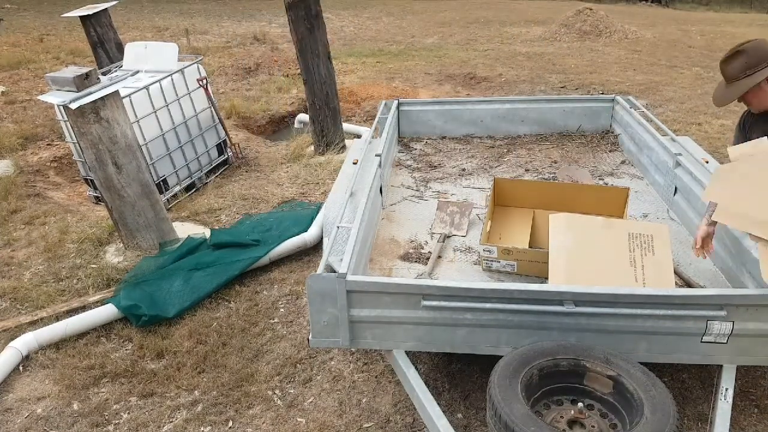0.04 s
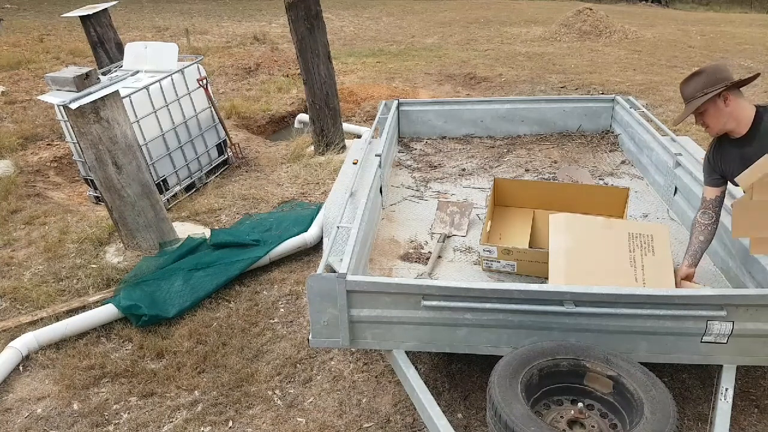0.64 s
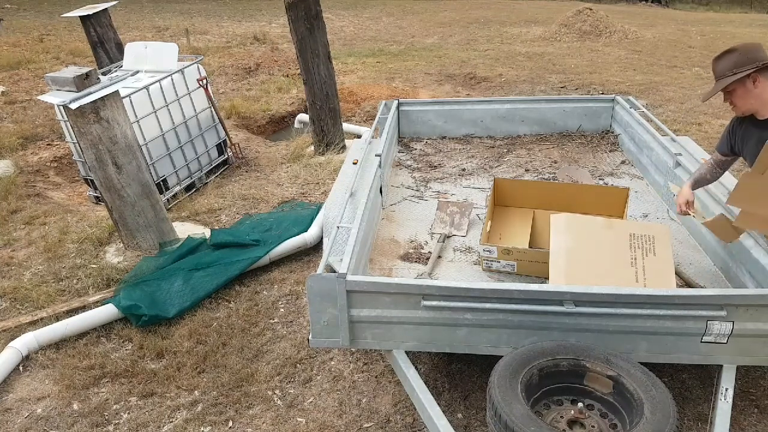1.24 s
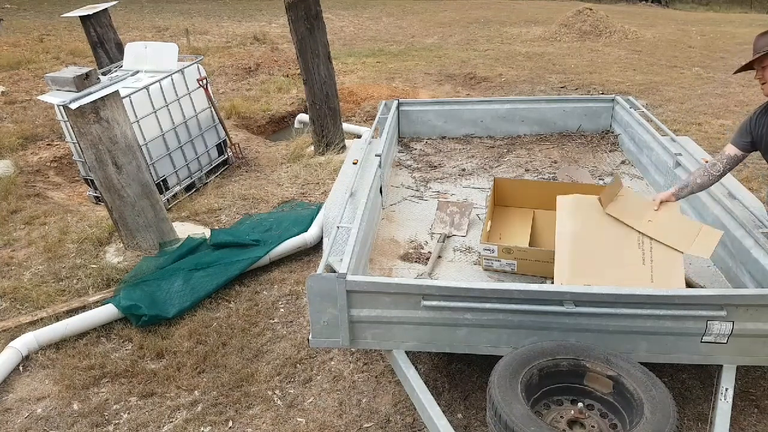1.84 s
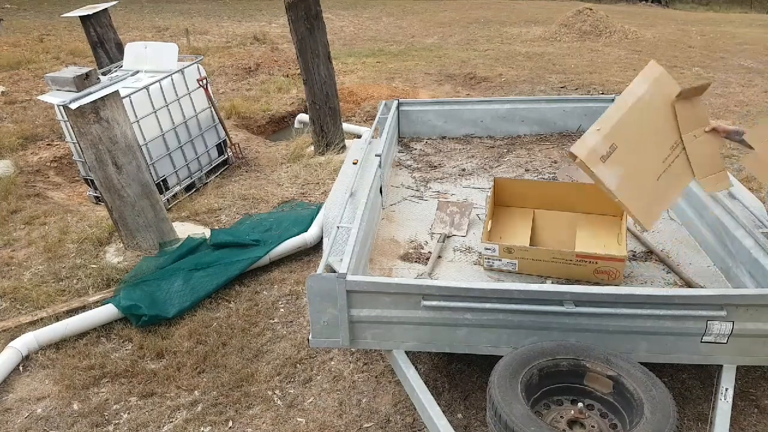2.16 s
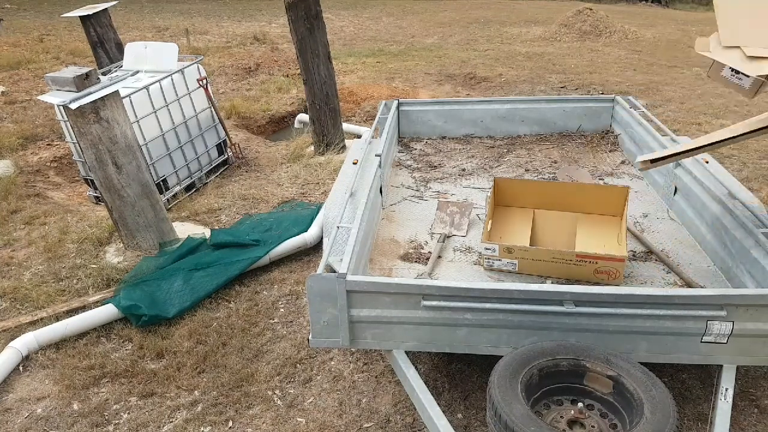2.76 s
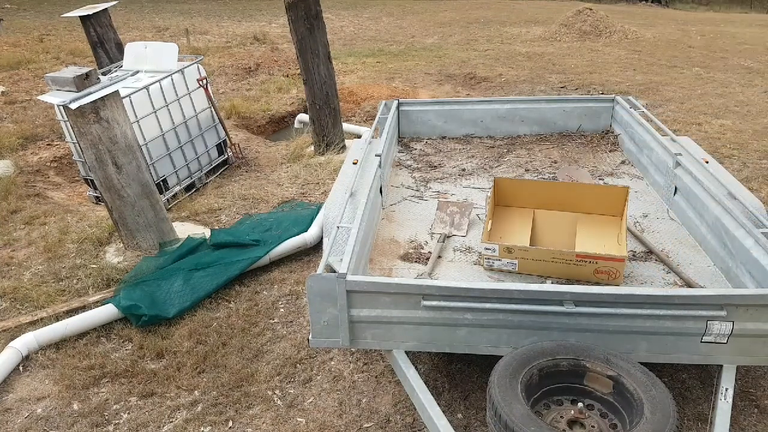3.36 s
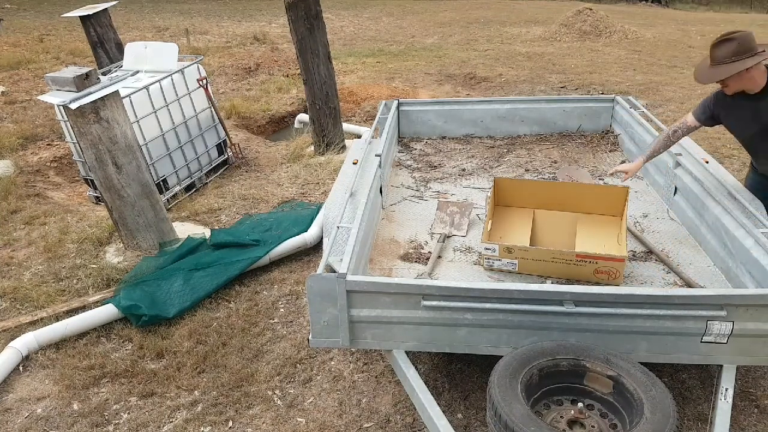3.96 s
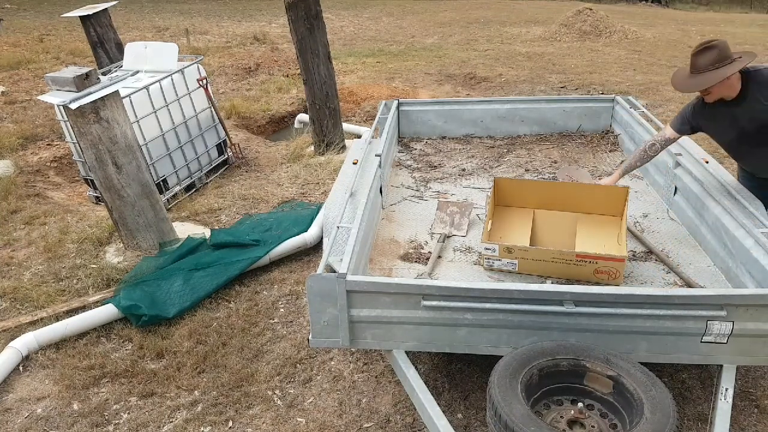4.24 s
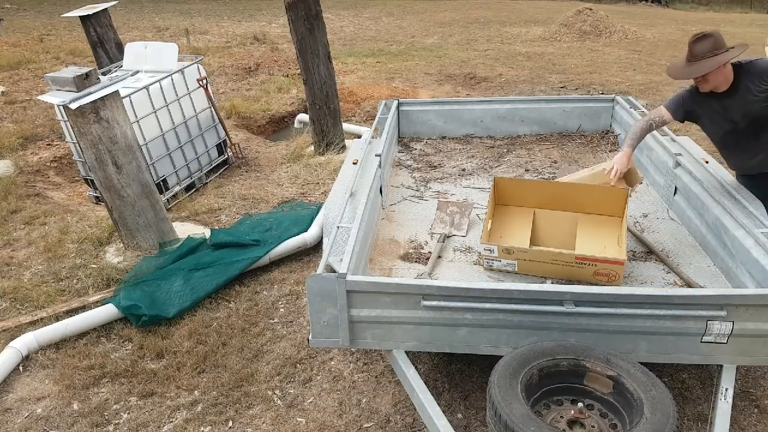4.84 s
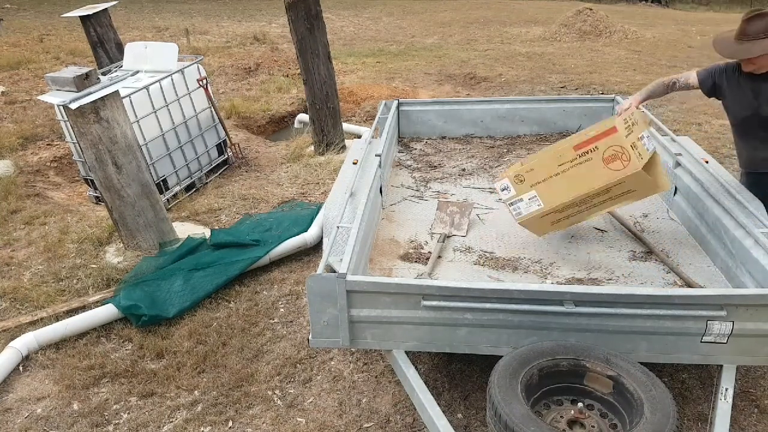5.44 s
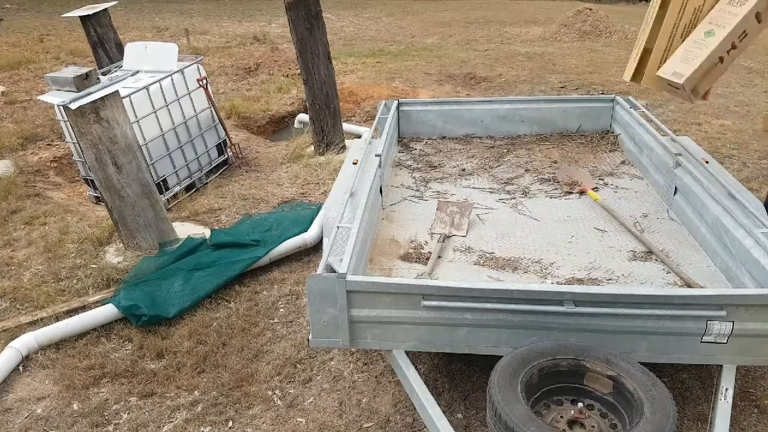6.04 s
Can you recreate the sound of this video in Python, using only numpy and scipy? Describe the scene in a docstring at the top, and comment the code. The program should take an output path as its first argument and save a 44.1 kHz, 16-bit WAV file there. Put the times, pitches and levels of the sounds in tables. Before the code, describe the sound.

Soft outdoor air lies behind everything, cutting out for an instant at about 0.3 seconds. From 0.5 to 2 seconds, a few metres away, cardboard is dragged over the gritty bed of a steel trailer in short, uneven scrapes and rustles, with a cluster of hollow knocks around 0.9 seconds and more near 1.6 and 1.8. A few faint ticks lead into a lull. From 3 to 3.5 seconds cardboard slides lightly with a papery hiss, then lands with a hollow knock at 3.6. Another box starts moving at about 3.9 seconds and builds to the loudest stretch, from 4.8 to 5.5, with rumbling panels, rasping edges, knocks, ticks and tiny squeaks. The trailer walls add a very short, close reflection. A last faint rustle fades at around 6 seconds.

```python
"""A steel trailer in quiet open country: a few metres away, someone pulls cardboard boxes out of it.
The boards stick and slip over the gritty bed, so panels rumble, edges rasp and paper faces hiss.
Hollow panels knock, edges tick and squeak, and the steel walls throw the body of the sound back
within milliseconds. Soft outdoor air lies behind; near the start everything drops out briefly."""
import sys
import numpy as np
from scipy import signal
from scipy.fft import rfft, irfft, next_fast_len
from scipy.io import wavfile
from scipy.ndimage import uniform_filter1d

SR = 44100
rng = np.random.default_rng(int(sys.argv[2]) if len(sys.argv) > 2 else 0)


def transcribe(signal):
    """Save signal, clipped to [-1, 1], as a 16-bit WAV file at the path in sys.argv[1]."""
    frames = np.atleast_2d(signal).T
    limited = np.clip(frames, -1, 1)
    pcm = np.round(limited * 32767).astype(np.int16)
    wavfile.write(sys.argv[1], SR, pcm)


N = 268701
TIME = np.arange(N) / SR

# Cardboard slides: a sheet is gathered, a flat box dragged out, both put down, an open box pulled.
# Each row: start in seconds, length in seconds, rumble, rasp and hiss in dB, panel pitch in Hz.
STROKES = [ (0.455, 0.073, -61, -59.5, -65, 451.6), (0.509, 0.02, -45, -47, -54.5, 453.6),
           (0.589, 0.1031, -49, -59, -67, 400.3), (0.703, 0.061, -45, -52.5, -61.5, 329.5),
           (0.806, 0.1238, -44.5, -45.5, -54, 452.1), (.91, 0.077, -42.5, -56, -54.5, 498),
           (1.0, 0.1302, -48, -51.5, -51.5, 500), (1.136, 0.0399, -45.5, -57, -79, 451.1),
           (1.268, 0.0502, -47, -53.5, -63, 298.9), (1.327, 0.1183, -55, -71, -89, 269.2),
           (1.547, 0.0417, -40, -53, -63, 450.4), (1.619, 0.1, -42, -46.5, -58.5, 470.2),
           (1.748, 0.1357, -44.5, -52, -71, 419), (1.872, 0.059, -42, -47.5, -71, 525.2),
           (2.06, 0.076, -57.5, -54.5, -70, 551.9), (2.749, 0.214, -72, -67, -69.5, 701.4),
           (3.022, 0.13, -51.5, -53.5, -57, 722.5), (3.195, 0.11, -60.5, -62, -61.5, 702.9),
           (3.301, 0.068, -50.5, -57.5, -61, 695.5), (3.38, 0.1413, -56, -61, -64, 719.2),
           (3.866, .31, -60.5, -68, -69.5, 499.9), (4.28, 0.1864, -46.5, -57, -65, 330),
           (4.402, 0.077, -43.5, -48, -57, 344.2), (4.495, .14, -49.5, -52, -53.5, 381.9),
           (4.664, 0.13, -49.5, -70, -64, 387.7), (4.823, 0.0571, -38, -43, -49.5, 372.8),
           (4.897, 0.1226, -40.5, -44, -54.5, 299.7), (5.039, 0.0413, -37, -46, -52.5, 431.3),
           (5.096, 0.076, -45, -54.5, -58.5, 219.2), (5.194, .14, -37.5, -43, -48.5, 249.7),
           (5.358, 0.0426, -36, -41, -46.5, 396.9), (5.432, 0.14, -47.5, -53, -65.5, 444.6),
           (5.692, 0.068, -59, -62, -62, 438.4), (5.748, 0.45, -62.5, -70, -81, 439.7)]
# Bending modes of the boxes. Each row: pitch in Hz, width in Hz, gain in dB.
PANEL_MODES = [(154, 38, 3), (268, 20, -5.5), (343, 86, -6.5), (469, 20, 3), (605.7, 16, 5),
               (787, 55, -4.5), (1021, 58, 2), (1327, 80, -3), (1750, 140, -5.5), (2350, 260, -9.5)]
# Tone curves of the sliding board. Each row: frequency in Hz, gain in dB.
RUMBLE_EQ = [(40, -12.5), (100, -3.5), (180, -2.5), (330, 4), (560, 1.5), (900, -3), (1400, -34.5),
             (3000, -43.5)]  # shaking panels
RASP_EQ = [(300, -21.5), (650, -14.5), (1000, -4.5), (1500, -0.5), (2100, -2.5), (3000, -5), (4500, -11),
           (8000, -18)]  # scraping edges
HISS_EQ = [(1200, -18.5), (3000, -0.5), (5000, -1), (7000, -1.5), (9200, -6.5), (12000, -5.5), (15500, -15)]  # paper fibres
SHEEN_EQ = [(3000, -16.5), (8000, -6.5), (13500, -3), (16000, -6)]  # paper that glides lightly
# Hollow knocks. Each row: start in seconds, level in dB, pitch in Hz, crack in dB against the thump.
KNOCKS = [(0.6231, -48, 830, -20), (0.8584, -28, 557, -33), (0.8678, -31.5, 566, -23),
          (.888, -37, 500, -10), (.956, -30, 802, -12), (.968, -34, 515, -7.5), (1.143, -45, 560, -13),
          (1.273, -47, 700, -9), (1.549, -46, 594, 0), (1.625, -35, 602, -6), (1.808, -36.5, 371, -25),
          (2.256, -57, 710, -5), (2.631, -58.5, 620, -5), (3.283, -43, 648, -17), (3.447, -49, 620, -24),
          (3.483, -50.5, 570, -22), (3.6034, -30.5, 668, -20.5), (3.624, -46, 850, -6.5),
          (4.18, -57, 570, -22), (4.638, -44, 443, -8), (4.737, -45, 272, -15.5), (4.781, -55, 507, 0),
          (4.829, -52, 470, -16), (5.06, -37, 235, -11), (5.181, -43.5, 423, -5), (5.2146, -30, 286, -15),
          (5.232, -29.5, 577, -16), (5.283, -43, 229, -12), (5.383, -37, 880, -23)]
# Edges juddering on board or steel. Each row: start in seconds, level in dB, pitch in Hz.
SQUEAKS = [(3.2134, -49, 3050), (4.457, -59, 2580), (4.854, -45, 2086), (4.925, -53, 1630),
           (4.957, -41, 1760), (5.049, -46, 1550), (5.231, -44, 1234), (5.288, -44.5, 1508),
           (5.309, -48, 1460), (5.365, -42, 1383), (5.38, -43.5, 1185)]
# Edges and grit that catch and snap. Each row: start in seconds, level in dB, ring in Hz.
TICKS = [(0.515, -57, 1894), (1.273, -53, 2480), (1.288, -54, 2680), (1.6249, -66, 1870),
         (2.0644, -55, 2230), (2.0822, -54, 2220), (2.1076, -53.5, 2102), (3.2411, -52.5, 3440),
         (3.2842, -55.5, 3560), (3.3872, -58.5, 3200), (3.609, -55, 2950), (3.679, -62, 6000),
         (4.354, -56.5, 1900), (4.5173, -51.5, 5440), (4.8289, -53, 2100), (4.9292, -48.5, 1810),
         (4.9867, -50.5, 1800), (5.2344, -46.5, 4900)]
# Early reflections off the bed and walls. Each row: delay in seconds, linear gain.
REFLECTIONS = [(.0041, 0.076), (.0125, 0.11), (0.0213, .2)]
# Tone curve of the open air. Each row: frequency in Hz, gain in dB.
COUNTRY_EQ = [(25, -6.5), (60, -4.5), (140, -2.5), (250, -0.5), (470, 3), (800, -3.5), (1300, -10.5),
              (2100, -15), (3400, -7.5), (4500, -15.5), (6500, -20.5), (9000, -25), (12000, -27.5),
              (15500, -37)]
# The two microphone ports. Each row: frequency in Hz, left and right gain in dB, likeness from 0 to 1.
MIC_PORTS = [(105, 1.5, 3, .998), (505, -1, -1, 0.95), (1010, 1, 0.5, 0.99), (1840, 3, -2, 0.83),
             (3120, -4, -1.5, 0.02), (4430, -1.5, -2, 0.08), (4940, -0.5, -0.5, 0.03),
             (5880, 1, -6.5, 0.03), (7480, 5.5, -15.5, 0.85), (8860, -3, -12.5, 0.53), (11340, 9, -14, 0.1),
             (16200, -5, -10, 1)]

GRIP_SHARE, SAG_DB, RELEASE_T60_S = 0.16, -2.5, 0.21  # a stroke's build-up, easing and tail
STIFF_HZ = (450, 696)  # panels lose their bass as their pitch climbs through this range
FLAP_T60_S = 0.13  # chatter of loose flaps after a knock
RING_DB, RING_WIDTH_SHARE = -4, 0.071  # a struck panel sings briefly at its own pitch
COUNTRY_DB, MIC_HISS_DB = -60.5, -74.5
RIGHT_LEAD_S, TOP_HZ = 0.00019, 15850
DROPOUT_START_S, DROPOUT_END_S = .312, .448


def sliding():
    """Stick and slip shakes panels, rasps edges and crackles fibres: a mono body and a stereo hiss."""
    rumble_gain, rasp_gain, hiss_gain, pitch_hz = stroke_envelopes()
    catches = slips(per_s=750, spread_db=4)
    grit = slips(per_s=2500, spread_db=11)
    board = panel(catches + .5 * grit, direct=0.98)
    board = varispeed(board, 1 + .07 * drift(7))  # bending and a shifting grip let the modes wander
    rumble = panel_rumble(board, catches, pitch_hz)
    judder = unit(undb(2.24 * drift(130)))
    rasp = even_out(colour(board, RASP_EQ), window_s=0.025) * judder
    lightness = hiss_gain / (hiss_gain + rumble_gain + 1e-9)
    hiss = paper_hiss(catches, lightness) * judder
    return rumble * rumble_gain + rasp * rasp_gain, hiss * hiss_gain


def stroke_envelopes():
    """Gains of rumble, rasp and hiss over all strokes, and the pitch of the panel that is rubbing."""
    power = np.zeros((3, N))
    for start_s, length_s, *levels_db, _ in STROKES:
        pressure = push(length_s)
        for track, db in zip(power, levels_db):
            add(track, start_s, (undb(db) * pressure) ** 2)
    starts, lengths, *_, pitches = np.transpose(STROKES)
    pitch_hz = np.interp(TIME, starts + lengths / 2, pitches)
    return (*np.sqrt(power), pitch_hz)


def push(length_s):
    """Pressure of one stroke: it grips, eases as the board comes free, and lets go."""
    t = np.arange(int((length_s + RELEASE_T60_S) * SR)) / SR
    grip = np.minimum(t / (GRIP_SHARE * length_s), 1)
    eased_db = SAG_DB * np.minimum(t / length_s, 1)
    released_db = -60 * np.maximum(t - length_s, 0) / RELEASE_T60_S
    return grip * undb(eased_db + released_db)


def panel_rumble(board, catches, pitch_hz):
    """The shaken board booms at its gliding pitch; the stiffer the panel, the thinner its bass."""
    mean_hz = pitch_hz.mean()
    hollow = resonate(resonate(catches, mean_hz, 0.5 * mean_hz), mean_hz, mean_hz)
    hollow = unit(varispeed(hollow, pitch_hz / mean_hz))
    limp = unit(colour(board, RUMBLE_EQ))
    stiff = unit(colour(limp, [(150, -17), (450, -1.5)]))
    stiffness = np.interp(pitch_hz, STIFF_HZ, [0, 1])
    return even_out((1 - stiffness) * limp + stiffness * stiff + 0.86 * hollow, window_s=0.017)


def paper_hiss(catches, lightness):
    """Fibres crackle on their own and at every catch; the lighter the stroke, the brighter they sound."""
    fibres = [slips(per_s=3500, spread_db=5) + .45 * catches for _ in range(2)]
    sheen = 10 * np.minimum(lightness, .46) ** 3
    return np.array([unit(colour(f, HISS_EQ)) + sheen * unit(colour(f, SHEEN_EQ)) for f in fibres])


def slips(per_s, spread_db):
    """Friction lets go at random moments, in clicks of unequal size."""
    happens = rng.random(N) < per_s / SR
    size = undb(spread_db * np.clip(rng.standard_normal(N), -2, 2))
    return unit(happens * size * rng.choice([-1, 1], N))


def panel(force, direct):
    """A force heard directly and through the bending modes of the board."""
    return direct * force + sum(undb(db) * resonate(force, hz, width) for hz, width, db in PANEL_MODES)


def knocks():
    """Each blow thumps a heavily damped panel, wakes the box modes and cracks at the edge."""
    out, t = np.zeros(N), np.arange(SR // 5) / SR
    for start_s, db, hz, crack_db in KNOCKS:
        force = panel(blow(t, FLAP_T60_S, chatter=.05), direct=2.5)
        # the soft contact passes little far above the panel's pitch
        thump = colour(force, [(0.16 * hz, -21), (0.43 * hz, -12), (0.41 * hz, -3), (hz, 0),
                               (1.406 * hz, -4), (1.95 * hz, -25), (5 * hz, -48)])
        thump = thump + undb(RING_DB) * resonate(thump, hz, RING_WIDTH_SHARE * hz)
        edge_force = blow(t, FLAP_T60_S, chatter=0.11)
        crack = colour(edge_force, [(500, -35), (1200, 8), (2900, 1), (5000, -8.5), (15000, -20)])
        add(out, start_s, at_level(thump, db) + at_level(crack, db + crack_db))
    return out


def blow(t, t60_s, chatter):
    """One sharp contact with a tail of dying chatter."""
    force = chatter * rng.standard_normal(len(t)) * undb(-60 * t / t60_s)
    force[0] += 1
    return force


def squeaks():
    """For a few hundredths of a second an edge's slips fall into a rough, nearly regular rhythm."""
    out, t = np.zeros(N), np.arange(SR // 20) / SR
    swell = t * np.exp(-t / 0.0029)
    for start_s, db, hz in SQUEAKS:
        wobble = unit(uniform_filter1d(rng.standard_normal(len(t)), size=24))
        phase = 2 * np.pi * np.cumsum(hz * (1 + 0.17 * wobble)) / SR
        tone = np.sin(phase) + 0.063 * np.sin(2 * phase) + 0.35 * np.sin(3 * phase)
        add(out, start_s, at_level(swell * tone, db))
    return out


def ticks():
    """An edge lets go and rings briefly: a bright snap of breaking fibres, then a thinner rustle."""
    out, t = np.zeros(N), np.arange(SR // 12) / SR
    for start_s, db, hz in TICKS:
        force = blow(t, t60_s=0.013, chatter=0.94) + blow(t, t60_s=0.17, chatter=0.23)
        ring = 3 * resonate(force, hz, 0.095 * hz)
        add(out, start_s, at_level(colour(force, HISS_EQ) + ring, db))
    return out


def trailer(x, scatter_db, t60_s):
    """The steel walls add a few close reflections and a short, darkened tail."""
    t = np.arange(SR // 3) / SR
    response = rng.standard_normal(len(t)) * undb(-60 * t / t60_s) * (t > .006)
    response *= undb(scatter_db) / np.linalg.norm(response)
    for delay_s, gain in REFLECTIONS:
        add(response, delay_s, np.array([gain]))
    echoes = signal.oaconvolve(x, response)[:N]
    return x + colour(echoes, [(1200, -2), (5000, -0.5), (14000, -26)])


def from_the_right(x, taps=256):
    """Sound reaches the right port first; its treble scatters round the case differently to each."""
    length = next_fast_len(N + taps)
    hz = np.arange(length // 2 + 1) * SR / length
    port_hz, _, _, likeness = np.transpose(MIC_PORTS)
    alike = np.clip(on_log_axis(hz, port_hz, likeness), 0, 1)
    channels = []
    for delay_s in (RIGHT_LEAD_S, 0):
        scatter = rfft(rng.standard_normal(taps), length) / np.sqrt(taps)
        path = np.sqrt(alike) + np.sqrt(1 - alike) * scatter
        # scattering turns the phase far more than it changes the level
        path *= np.sqrt(1.1 / (np.abs(path) ** 2 + .1))
        delay = np.exp(-2j * np.pi * hz * delay_s)
        channels.append(irfft(rfft(x, length) * path * delay, length)[:N])
    return np.array(channels)


def country_air():
    """A soft, gently wavering bed of open air, centred in the bass and wide above it."""
    mid, side = [unit(colour(rng.standard_normal(N), COUNTRY_EQ)) for _ in range(2)]
    side = colour(side, [(40, -1), (120, -15), (500, -9.5), (1200, 2), (3000, 0.5)])
    return np.array([mid + side, mid - side]) * undb(COUNTRY_DB + .7 * drift(5))


def undb(db):
    """Decibels to linear gain."""
    return 10 ** (np.asarray(db) / 20)


def unit(x):
    """Scale to rms 1."""
    return x / np.sqrt(np.mean(x ** 2))


def at_level(x, db):
    """Scale a hit so that its energy, spread over 20 ms, has this level."""
    return x * undb(db) * np.sqrt(SR / 50 / np.sum(x ** 2))


def even_out(x, window_s):
    """Ride the short-time level towards 1, leaving the grain."""
    return x / np.sqrt(uniform_filter1d(x ** 2, int(window_s * SR)) + 0.15 * np.mean(x ** 2))


def add(track, at_s, x):
    """Mix x into the track at a time."""
    i = int(at_s * SR)
    track[i:i + len(x)] += x[:len(track) - i]


def on_log_axis(hz, points_hz, values):
    """Join points by straight lines over log frequency."""
    return np.interp(np.log(hz + 1), np.log(points_hz), values)


def colour(x, points, size=2048):
    """Minimum-phase EQ through points of frequency in Hz and gain in dB."""
    hz = np.arange(size // 2 + 1) * SR / size
    log_gain = np.log(undb(on_log_axis(hz, *np.transpose(points))))
    cepstrum = irfft(log_gain)[:size // 2]
    cepstrum[1:] *= 2
    response = irfft(np.exp(rfft(cepstrum, size)))
    return signal.oaconvolve(x, response)[:len(x)]


def resonate(x, hz, width_hz):
    """One resonance, gain 1 at its centre."""
    return signal.lfilter(*signal.iirpeak(hz, hz / width_hz, fs=SR), x)


def drift(per_s):
    """Random wander at rms 1, gliding to a new value this many times a second."""
    step = int(SR / per_s)
    stairs = np.repeat(rng.standard_normal(N // step + 1), step)
    return unit(uniform_filter1d(stairs, step)[:N])


def varispeed(x, speed):
    """Loop a steady texture at a changing speed, so that its resonances move."""
    return np.interp(np.cumsum(speed) % N, np.arange(N), x)


def scene():
    """The boxes sound in the trailer, with dry hiss and ticks on top and open air behind."""
    body, hiss = sliding()
    boxes = trailer(body + knocks() + squeaks(), scatter_db=-14, t60_s=.22)
    # the boxes carry almost no deep bass below about 70 Hz
    boxes = signal.sosfilt(signal.butter(3, 72, "highpass", fs=SR, output="sos"), boxes)
    # the short waves of hiss and ticks differ at the two ports, so each side gets its own
    return from_the_right(boxes) + hiss + np.array([ticks(), ticks()]) + country_air()


def record(dry):
    """Each port adds its colour and a faint hiss; the sound drops out once, briefly; the top is cut."""
    ports = np.array(MIC_PORTS)
    wet = np.array([colour(dry[c], ports[:, [0, c + 1]]) for c in range(2)])
    wet += undb(MIC_HISS_DB) * rng.standard_normal((2, N))
    live = (TIME < DROPOUT_START_S) | (TIME > DROPOUT_END_S)
    gate = np.maximum(uniform_filter1d(live.astype(float), size=64), undb(-101.5))
    high_cut = signal.ellip(10, .2, 70, TOP_HZ, fs=SR, output="sos")
    return signal.sosfilt(high_cut, wet * gate)


dry = scene()
out = record(dry)
transcribe(out)
```